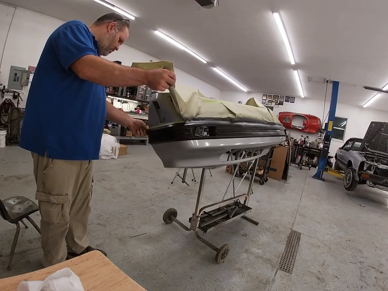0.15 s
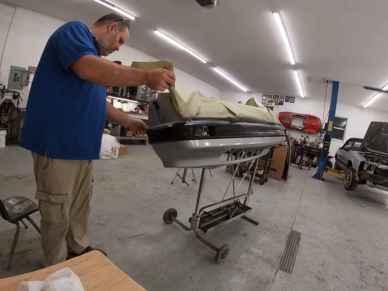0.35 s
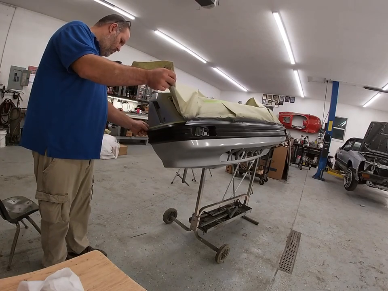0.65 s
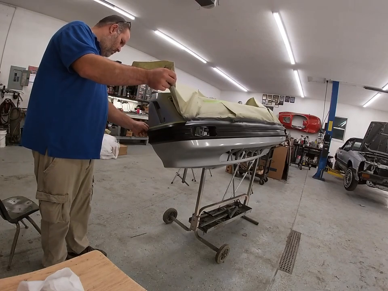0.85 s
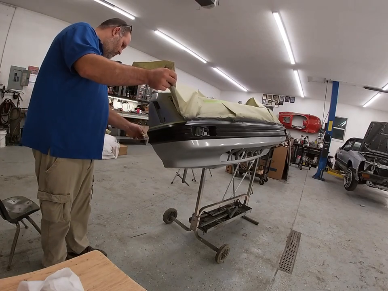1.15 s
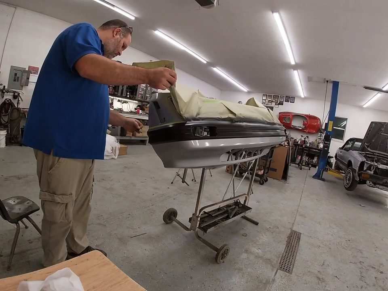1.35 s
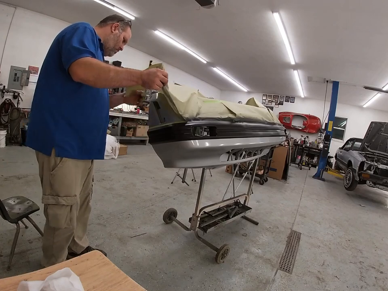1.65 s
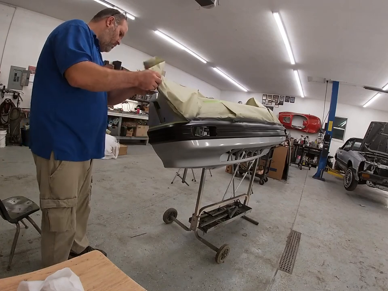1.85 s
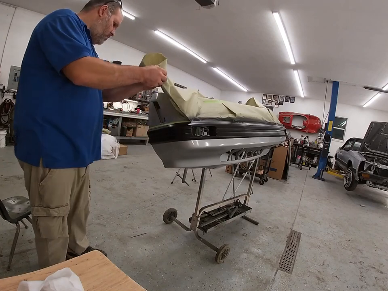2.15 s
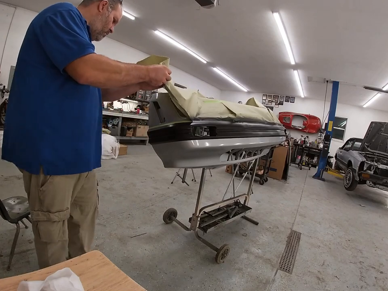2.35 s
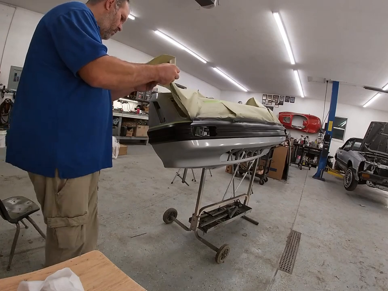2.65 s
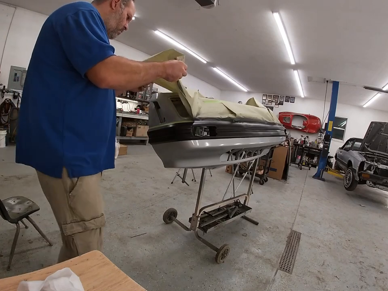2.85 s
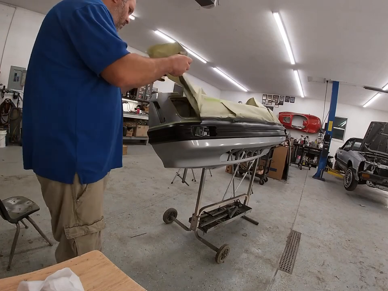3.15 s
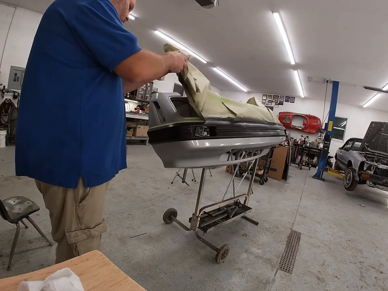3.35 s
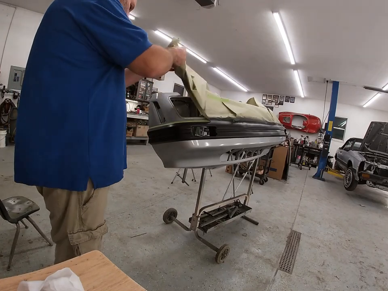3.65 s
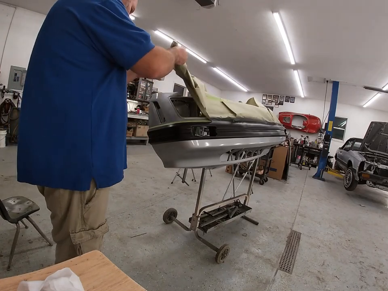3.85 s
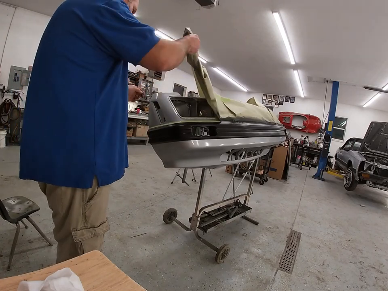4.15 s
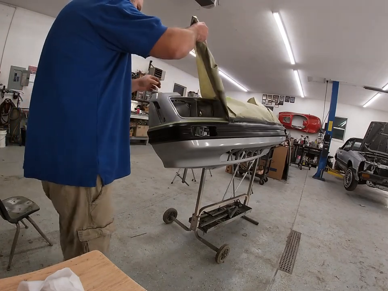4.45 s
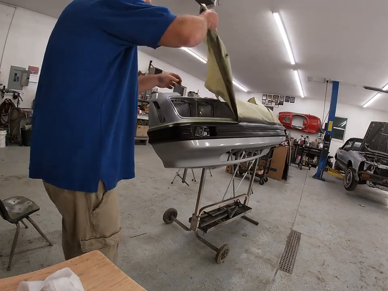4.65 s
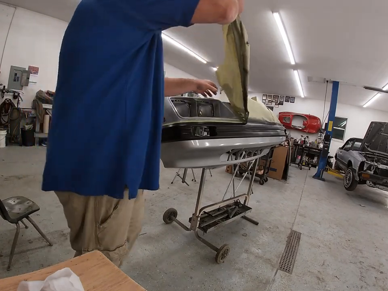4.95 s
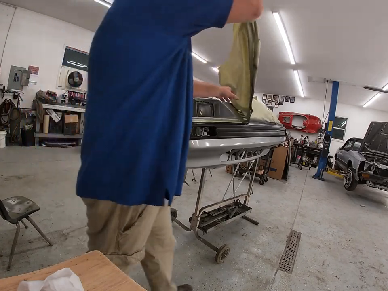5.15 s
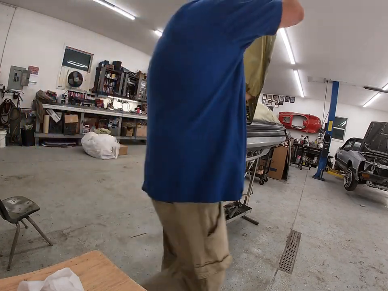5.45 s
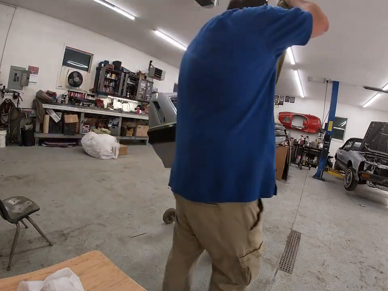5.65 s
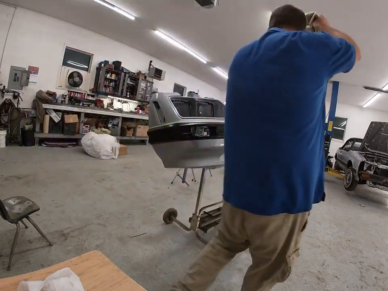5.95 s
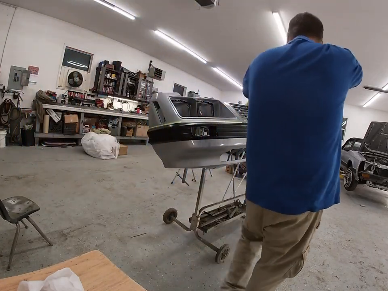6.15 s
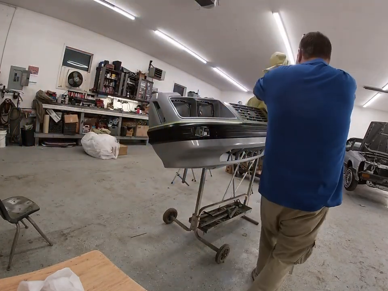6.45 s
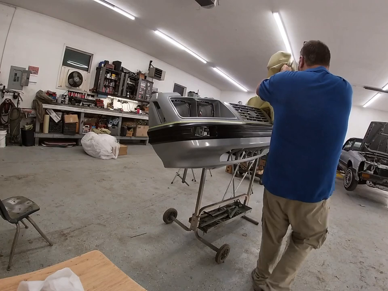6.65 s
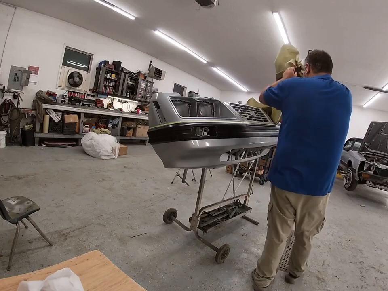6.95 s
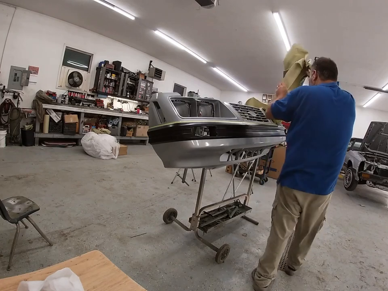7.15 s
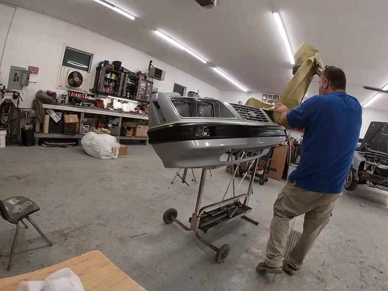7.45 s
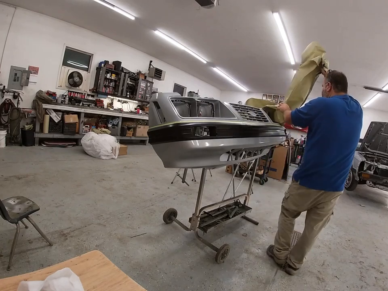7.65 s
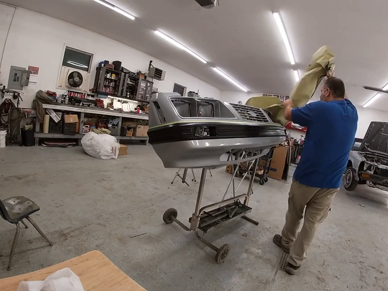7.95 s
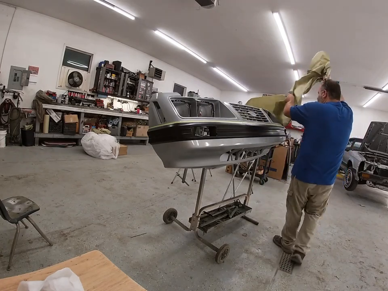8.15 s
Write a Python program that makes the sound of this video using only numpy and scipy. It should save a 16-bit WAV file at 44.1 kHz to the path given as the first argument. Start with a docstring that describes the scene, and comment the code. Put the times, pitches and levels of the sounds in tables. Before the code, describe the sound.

Faint hum and room air, a few tiny clicks and one dull hollow bump open the scene. Then paper bursts into brittle crackling, with popping creases and little tape chirps, pausing and surging with each pull. Later the sheet is gathered in a dense crinkle, with soft low drumming underneath. The big hard hall adds about a second of diffuse echo; the single fixed microphone hears the worker move away.

```python
"""A large, echoing workshop: masking paper and tape come off a painted car part, heard in mono.
Room air, a wavering hum and a faint drone lie behind it all; the drone sinks, then mostly glides upward.
First fingers click on the tape and a hand knocks the hollow part once.
Then tugs make the stiff sheet crackle, snap and flap as many tiny ringing buckles over low noise, and tape chirps.
As the worker moves off, the direct sound falls against the hall's echo, then partly recovers."""
import sys
import numpy as np
from scipy import signal
from scipy.fft import rfft, irfft, next_fast_len
from scipy.io import wavfile
from scipy.ndimage import map_coordinates

SR = 44100
rng = np.random.default_rng(int(sys.argv[2]) if len(sys.argv) > 2 else 0)


def bounce(signal):
    """Save signal as a 16-bit WAV file at the path given by the first command-line argument."""
    frames = np.transpose(np.atleast_2d(signal))
    limited = np.clip(frames, -1, 1)
    pcm = np.round(limited * 32767).astype(np.int16)
    wavfile.write(sys.argv[1], SR, pcm)


N = 365148  # length in samples


def amp(db):
    """Decibels to gain."""
    return 10 ** (np.asarray(db) / 20)


def unit(x):
    """Scale to rms 1."""
    return x / np.sqrt(np.mean(x ** 2) + 1e-20)


def along(points, hz):
    """Read (f/Hz, value) points on a log frequency axis."""
    f, v = np.transpose(points)
    return np.interp(np.log(hz + 1), np.log(f), v)


def curves(rows):
    """Interpolate each column after t/s to one value per sample."""
    s, *columns = np.transpose(rows)
    now = np.arange(N) / SR
    return [np.interp(now, s, column) for column in columns]


def wobble(rate):
    """A smooth random curve with rate knots a second."""
    knots = rng.standard_normal(4096)
    return map_coordinates(knots, [np.arange(N) * rate / SR], order=2, mode="wrap")


def colour(x, spectrum, size=4096):
    """Causal minimum-phase filter with the given spectrum, so that attacks stay sharp."""
    log_gain = np.log(amp(along(spectrum, np.fft.rfftfreq(size, 1 / SR))))
    cepstrum = irfft(log_gain)
    # folding the cepstrum onto positive time makes the filter causal
    cepstrum[1:size // 2] *= 2
    cepstrum[size // 2 + 1:] = 0
    impulse = irfft(np.exp(rfft(cepstrum)))
    return signal.oaconvolve(x, impulse)[:len(x)]


def add(track, s, sound):
    """Mix a sound into the track at time s."""
    part = track[max(round(s * SR), 0):][:len(sound)]
    part += sound[:len(part)]


def creases(count, spread_db, life, top_hz, size=96):
    """A stream of tiny buckles of unequal strength, each a brief ring (decay life in s) at its own pitch."""
    when, pitch, phase = rng.random((count, 3)).T[:, :, None]
    strength = amp(spread_db * np.minimum(rng.standard_normal((count, 1)), 2.5))
    t = np.arange(size) / SR
    rings = strength * np.exp(-t / life) * np.cos(2 * np.pi * (top_hz * pitch * t + phase))
    places = (when * N).astype(int) + np.arange(size)
    return unit(np.bincount(places.ravel(), rings.ravel(), N)[:N])


def avalanches(count, spread_db, t60, size=1024):
    """One buckle sets off its neighbours: sudden bursts of activity that die within milliseconds."""
    strength = amp(spread_db * np.minimum(rng.standard_normal(count), 2.3))
    kicks = np.bincount(rng.integers(0, N, count), strength ** 2, N)
    decay = amp(-60 * np.arange(size) / SR / t60) ** 2
    energy = signal.oaconvolve(kicks, decay)[:N]
    return unit(np.sqrt(np.abs(energy)))


# Spectra of the sheet's wide folds, fine folds, adhesive ticks and flapping: f/Hz, relative level/dB per Hz
CRINKLE_SPECTRUM = [(400, -30), (650, -10), (900, -5), (1400, -2.5), (2000, -2), (2900, -1), (3800, -2.5),
                    (4600, -7.5), (6000, -27), (9000, -65)]
CRISP_SPECTRUM = [(2500, -52), (3800, -6.5), (4600, -2.5), (5600, 1.5), (6900, -0.5), (7500, -12.5),
                  (8200, -18), (9800, -16), (11300, -43.5), (13000, -28.5), (15000, -51), (15800, -30)]
GLUE_SPECTRUM = [(1000, -27), (2500, -12), (4000, -9), (6900, 14), (8200, -7), (9800, -18), (11500, -8.5),
                 (15000, -27), (15800, -30)]
FLAP_SPECTRUM = [(30, -31), (70, -32), (95, -8), (125, -24), (150, -0.5), (182, 3.5), (220, 1.5), (350, 1),
                 (480, -2), (650, 0.5), (900, -7.5), (1500, -52)]


def paper():
    """Small creases crackle in bursts and glue ticks loose while the whole sheet flaps underneath."""
    crinkle_gain, crisp_gain, flap_gain = effort()
    bursts = avalanches(count=4500, spread_db=4.2, t60=.013)
    wide_folds = creases(count=22000, spread_db=0.0, life=0.0001, top_hz=7100)
    fine_folds = creases(count=24000, spread_db=2.4, life=0.00014, top_hz=14700)
    # the sheet catches and gives as it moves, so the crackle comes in uneven clumps
    catches = amp(1.3 * wobble(26) - .2)
    crisp_flicker = amp(1.5 * wobble(32) - 0.82)
    crinkle = unit(colour(wide_folds * bursts, CRINKLE_SPECTRUM)) * catches
    crisp = unit(colour(fine_folds * bursts, CRISP_SPECTRUM)) * catches * crisp_flicker
    # a taut, crisp sheet also pulls hardest on the glue
    loosened = creases(count=330, spread_db=5.5, life=.00008, top_hz=13600)
    ticks = amp(-13) * unit(colour(loosened, GLUE_SPECTRUM))
    flutter = rng.standard_normal(N) * avalanches(count=1100, spread_db=4.0, t60=0.24)
    flap = unit(colour(flutter, FLAP_SPECTRUM))
    return crinkle_gain * crinkle + crisp_gain * (crisp + ticks) + flap_gain * flap


# A tug jerks the sheet taut, slackens as the paper yields, then lets go
ATTACK_S, JERK_DB, JERK_S = .022, 4, 0.021
SAG_DB_PER_S, RELEASE_DB_PER_S = 3, 230
# From LIFTED_S on the hanging sheet keeps stirring; crisp treble and flapping are relative to its crinkle
LIFTED_S, STIR_DB, STIR_CRISP_DB, STIR_FLAP_DB = 1.72, -47, -5, -8
# Each tug or squeeze of the sheet, before the jerk, sag and release:
# start t/s, length t/s, crinkle level/dB, crisp treble level/dB and flapping level/dB relative to crinkle
TUGS = [(0.0, 0.1, -73, 3.5, 7), (1.566, .04, -48.5, -25, -2.5), (1.69, .03, -33.5, -8, -13),
        (1.709, 0.022, -30, -1, -11), (1.792, 0.19, -30.5, -3, -10.5), (2.217, 0.063, -50.5, 9, 2),
        (2.41, 0.081, -40, -4.5, -8.5), (2.693, .04, -35, -2.5, -10.5), (2.867, 0.17, -39.5, -1, -11),
        (3.002, 0.2, -37.5, 0.5, -2.5), (3.117, .035, -22, 0, -11), (3.185, 0.2, -29, -3.5, -11),
        (3.414, 0.24, -35, -1.5, -10.5), (3.6, 0.054, -30, 2.5, -4.5), (3.745, 0.069, -33, -4, -11.5),
        (3.976, 0.059, -38.5, -1.5, -6), (4.02, 0.032, -31.5, -2, -10), (4.073, 0.12, -26.5, 0, -9),
        (4.186, 0.015, -30, 7, 0), (4.339, 0.17, -32, 0, -10), (4.46, 0.21, -28, -3.5, -10.5),
        (4.68, 0.04, -25, -2.5, -13), (4.76, 0.083, -33, -3, -11), (4.861, 0.06, -26.5, -4.5, -10.5),
        (4.921, 0.065, -27.5, -3, -9), (5.015, 0.053, -37.5, 5, -2), (5.11, 0.088, -45.5, 2.5, -8),
        (5.27, 0.026, -29.5, -1, -14), (5.306, 0.17, -27.5, -1.5, -12), (5.492, 0.52, -28.5, -0.5, -9.5),
        (6.025, 0.29, -25, -1, -9.5), (6.366, 0.29, -28, -2.5, -10.5), (6.635, 0.25, -27, -2.5, -13),
        (6.828, 0.05, -25, 1, -11.5), (6.958, 0.13, -29, -6, -11.5), (7.08, 0.025, -30, 2.5, -12),
        (7.163, 0.093, -32, -7, -7.5), (7.274, 0.21, -27.5, -6, -9.5), (7.535, .18, -29, -2, -9.5),
        (7.77, .28, -30, -2.5, -11), (8.067, 0.039, -25.5, 2.5, -7.5), (8.107, .18, -24.5, -1, -14)]


def effort():
    """Gains of crinkle, crisp treble and flapping: the tugs add their energy to that of the stirring sheet."""
    now = np.arange(N) / SR

    def layers(db, crisp_db, flap_db):
        """Energies of the three layers, one row each."""
        return amp(db + np.array([[0], [crisp_db], [flap_db]])) ** 2

    energy = layers(STIR_DB, STIR_CRISP_DB, STIR_FLAP_DB) * (now > LIFTED_S)
    for s, length, db, crisp_db, flap_db in TUGS:
        start = max(round(s * SR), 0)
        t = now[:min(SR, N - start)]
        jerk_db = JERK_DB * np.exp(-t / JERK_S)
        release_db = RELEASE_DB_PER_S * np.maximum(t - length, 0)
        pull = np.minimum(t / ATTACK_S, 1) * amp(jerk_db - SAG_DB_PER_S * t - release_db)
        energy[:, start:start + len(t)] += layers(db, crisp_db, flap_db) * pull ** 2
    return np.sqrt(energy)


# What a sharp snap keeps at the microphone: f/Hz, level/dB
SHARP_SPECTRUM = [(100, -41), (600, -13), (1100, 5.5), (2000, 8.5), (6900, 6.5), (8200, -9.5),
                  (9800, -11.5), (11300, -20.5), (15500, -31)]


def snap(hz, t60, crack, crack_t60, size=4096):
    """A patch of stiff sheet pops: a short ring and a broad crack, peak 1."""
    t = np.arange(size) / SR
    ring = np.sin(2 * np.pi * hz * t) * amp(-60 * t / t60)
    noise = np.sign(rng.standard_normal(size)) * amp(-60 * t / crack_t60)
    pop = colour(ring + crack * noise, SHARP_SPECTRUM)
    return pop / np.abs(pop).max()


# Single creases that snap through: t/s, peak level/dB before the common lift in snaps(), f/Hz
SNAPS = [(1.5316, -35, 3240), (1.5702, -31.5, 3730), (1.6664, -38, 2050), (1.7265, -12, 3750),
         (1.7302, -21, 2790), (1.7404, -18, 3650), (1.9036, -12.5, 2730), (1.9755, -14.5, 2900),
         (2.0012, -14, 3080), (2.1585, -19.5, 1970), (2.3183, -25, 3760), (2.4146, -22.5, 1850),
         (2.7158, -25, 2380), (3.0442, -15.5, 3700), (3.115, -11, 3400), (3.3222, -8.5, 2670),
         (3.355, -11.5, 2740), (3.6556, -12, 5070), (3.6872, -6.5, 6200), (4.0843, -7.5, 6040),
         (4.2057, -4.5, 5900), (4.2127, -7, 6560), (4.3109, -11, 3200), (4.6209, -9.5, 2300),
         (4.8748, -7.5, 2280), (5.1107, -11.5, 3030), (5.3132, -10, 6240), (5.3374, -13, 2330),
         (5.4247, -11.5, 2910), (6.6613, -7.5, 3030), (7.1033, -8.5, 2930), (7.5438, -10.5, 2220)]


def snaps():
    """Large folds give way and bits of tape let go, each as a ring with a crack."""
    out = np.zeros(N)
    for s, db, hz in SNAPS:
        pop = snap(hz, t60=.005, crack=.85, crack_t60=.02)
        add(out, s, amp(db + 4.2) * pop)
    return out


def swells(rows, width):
    """Brief narrow resonances that swell and fade around their time; width is a share of the pitch."""
    out = np.zeros(N)
    for s, half, hz, db in rows:
        bell = np.exp(-((np.fft.rfftfreq(SR, 1 / SR) / hz - 1) / width) ** 2)
        noise = irfft(rfft(rng.standard_normal(SR)) * bell)
        band = unit(noise[:int(2 * half * SR)])
        add(out, s - half, amp(db) * np.hanning(len(band)) * band)
    return out


# Tape chirps: middle t/s, half length t/s, f/Hz, rms level/dB before the fade in and out
CHIRPS = [(2.693, .012, 1750, -31), (3.8075, .0035, 3200, -17), (5.113, .003, 2750, -20),
          (7.686, .009, 2200, -22)]


def tape_chirps():
    """Tape sticks and slips: very short swells of fairly wide resonant noise."""
    return swells(CHIRPS, width=0.33)


# Bulges of the slack sheet: middle t/s, half length t/s, f/Hz, rms level/dB before the fade in and out
BULGES = [(3.4, 0.29, 83, -49), (4.45, .25, 354, -44.5), (4.78, .1, 97, -49), (5.02, 0.15, 169, -42),
          (6.2, 0.41, 183, -41.5), (7.55, .35, 353.4, -40), (8.16, 0.092, 162, -42.5)]


def sheet_bulges():
    """The slack sheet bulges and drums: low swells of narrow resonant noise."""
    return swells(BULGES, width=0.083)


# Fingers and tape on the panel, except the row at 0.6285 s, an early echo of the click just before it: t/s,
# peak level/dB, f/Hz, ring t60 t/s, crack share
CLICKS = [(.223, -47, 1400, 0.065, .15), (.226, -51, 780, 0.16, 0.17), (.345, -51, 1420, 0.056, .15),
          (.433, -36, 3500, 0.00091, 1.4), (.437, -34, 700, 0.004, 0.51), (0.6195, -22, 3280, 0.01, 0.087),
          (0.6184, -33.5, 2100, 0.037, .03), (.6198, -18.5, 6700, 0.00047, 0.088),
          (.6285, -30, 3400, .005, .1), (0.9104, -23.5, 6850, 0.0042, 2.7),
          (2.2787, -5, 5830, 0.0025, 0.44), (2.279, -38, 1880, 0.0058, 0.33),
          (3.709, -4, 4570, 0.0016, .08), (5.408, -6, 9550, .003, 0.17)]


def clicks():
    """Fingers pick at the tape and its edges tick off the paint, as short rings and cracks; the one at 0.6285 s
    is an early echo of the click just before it."""
    out = np.zeros(N)
    for s, db, hz, t60, crack in CLICKS:
        add(out, s, amp(db) * snap(hz, t60, crack, crack_t60=.011))
    return out


# Modes of the hollow part's body: f/Hz, relative level/dB, t60 t/s
BODY = [(97, -32, .15), (203, -8.5, 0.2), (252, 2, 0.032), (335, -4.5, 0.097), (436, -22, 0.037),
        (585, -4.5, 0.027), (780, -7.5, 0.027), (1320, 13, 0.0035)]
# A hand bumps the hollow part: t/s, level/dB before the lift in knocks()
KNOCKS = [(0.9113, -28.5)]


def knocks():
    """A hand sets the body's modes ringing; the soft palm rounds off their attack."""
    out, t = np.zeros(N), np.arange(SR // 3) / SR
    thud = sum(amp(db - 60 * t / t60) * np.sin(2 * np.pi * hz * t) for hz, db, t60 in BODY)
    soft_palm = 1 - np.exp(-t / 0.00095)
    for s, db in KNOCKS:
        add(out, s, amp(db + 3.0) * thud * soft_palm)
    return out


# Reverberation of the hall: f/Hz, t60 t/s
HALL = [(100, 0.87), (300, 0.77), (1000, 1), (2800, 1), (6500, .82), (10000, 0.43), (15000, 0.37)]


def workshop(x, delay=.014, blur=.055, size=1024):
    """Diffuse echo of the hall: each band stores the sound's energy and loses it at its own speed."""
    hop = size // 4
    frames = dict(fs=SR, nperseg=size, noverlap=size - hop)
    hz, _, z = signal.stft(x, **frames)
    # the hall gathers sound sent in all directions, which evens out neighbouring bands
    neighbours = np.exp(-(np.log((hz[:, None] + 1) / (hz + 1)) / blur) ** 2)
    fed = neighbours @ np.abs(z) ** 2 / neighbours.sum(axis=1)[:, None]
    # share of its energy that each band keeps per hop
    keep = amp(-60 * hop / SR / along(HALL, hz)) ** 2
    stored = np.array([signal.lfilter([1 - k], [1, -k], band) for k, band in zip(keep, fed)])
    diffuse = signal.stft(rng.standard_normal(N), **frames)[2]
    echo = signal.istft(np.sqrt(stored) * diffuse / diffuse.std(), **frames)[1]
    return np.pad(echo, (round(delay * SR), 0))[:N]


# Room air: f/Hz, relative level/dB per Hz
AIR_SPECTRUM = [(20, -27), (75, 8.5), (110, -4), (160, 6), (260, -5.5), (500, -14.5), (1500, -15),
                (3500, -24.5), (6700, -22), (8200, -31), (10000, -38), (12000, -47), (16000, -52)]
# The low drone: t/s, f/Hz, rms level/dB
DRONE = [(0.0, 34.6, -67), (0.25, 34.6, -81), (0.6, 33.3, -48), (0.85, 31.7, -68), (1.04, 30.1, -51),
         (1.64, 28.6, -48), (2.14, 25.8, -58), (2.6, 27.4, -95), (3.0, 29, -39), (3.18, 30.4, -54),
         (3.53, 43.6, -57), (3.81, 49, -49), (4.61, 56.4, -57), (6.76, 52.6, -69), (7.59, 62.7, -49.5),
         (8.28, 77.8, -62)]


def background():
    """Room air as drifting noise, a hum wavering in level and phase, and the gliding low sine drone."""
    air_drift, hum_drift = amp(1.2 * wobble(5)), amp(2.5 * wobble(7))
    air = amp(-60.0) * unit(colour(rng.standard_normal(N), AIR_SPECTRUM)) * air_drift
    hum_phase = 2 * np.pi * 151 * np.arange(N) / SR + 0.7 * wobble(9.9)
    hum = amp(-63) * hum_drift * unit(np.sin(hum_phase))
    hz, db = curves(DRONE)
    drone = amp(db) * unit(np.sin(2 * np.pi * np.cumsum(hz) / SR))
    return air + hum + drone


CHIRP_ROOM_DB = -4  # the chirps excite the hall less than the big sheet does
# Direct sound at the microphone as the worker moves off and shields the sheet: t/s, level/dB
DIRECT = [(0, -2), (2.3, -1.5), (5.3, -5), (6, -8.5), (8.28, -4)]


def scene():
    """Paper, tape and panel, heard directly and through the hall, the same in both channels."""
    work = paper() + snaps() + clicks() + knocks()
    chirps = tape_chirps()
    direct_db, = curves(DIRECT)
    direct = amp(direct_db) * work + chirps
    echo = amp(-1.05) * workshop(work + amp(CHIRP_ROOM_DB) * chirps)
    mono = direct + echo + sheet_bulges() + background()
    return np.array([mono, mono])


TOP_HZ = 15700  # the camera's band limit


def record(dry):
    """The camera's microphone passes nothing at or above its band limit."""
    m = next_fast_len(N + 8192)
    passed = np.fft.rfftfreq(m, 1 / SR) < TOP_HZ
    return irfft(rfft(dry, m) * passed, m)[:, :N]


dry = scene()
out = record(dry)
bounce(out)
```